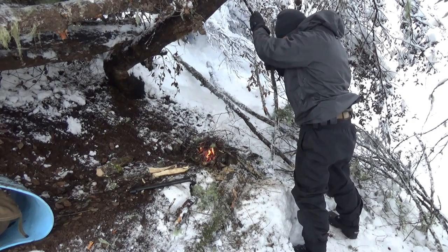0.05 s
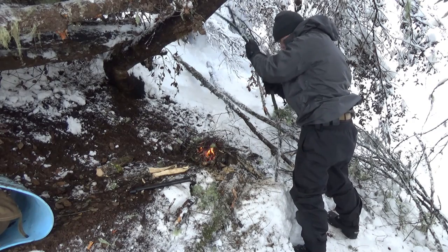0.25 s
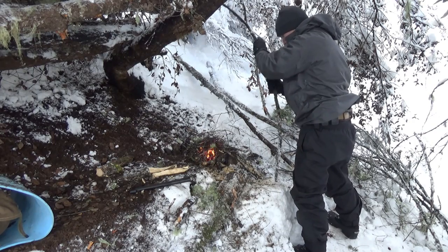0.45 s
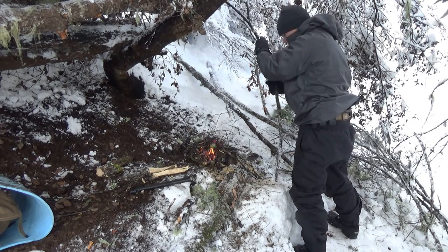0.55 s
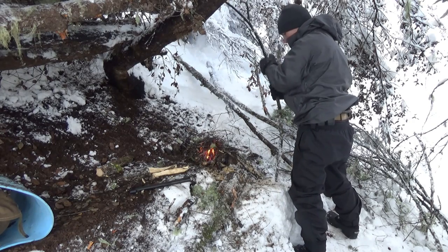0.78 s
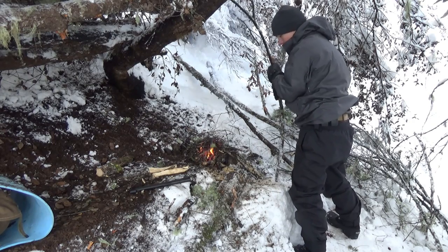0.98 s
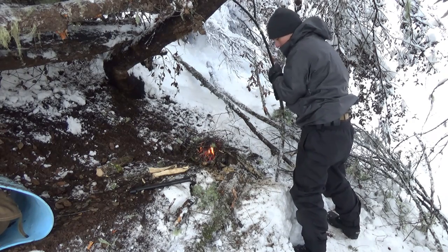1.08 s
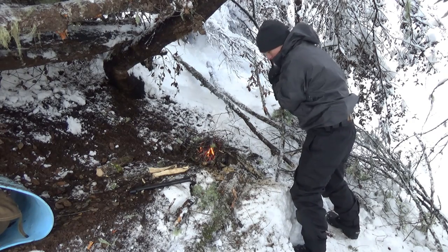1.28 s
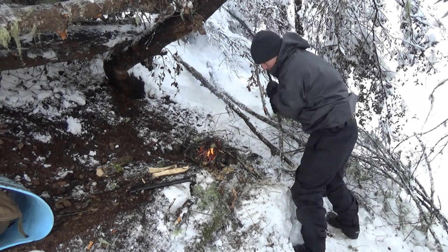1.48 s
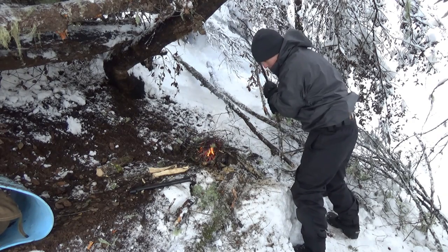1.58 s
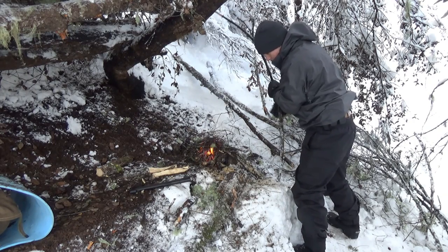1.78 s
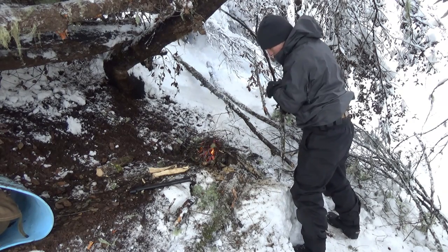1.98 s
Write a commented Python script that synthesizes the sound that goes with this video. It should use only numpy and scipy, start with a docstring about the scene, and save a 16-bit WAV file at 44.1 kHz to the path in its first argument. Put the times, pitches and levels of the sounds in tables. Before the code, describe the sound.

A dry stick breaks into crusted snow at 0.23 s with gritty crunches, a low thud and a sharp, short-ringing wooden knock at 0.27. Nylon sleeves swish around 0.65 and 0.87, then almost continuously from 1.3. A loud fire snap hits at 1.1; smaller pops are scattered throughout. Dull pushes crunch at 1.37-1.44, lighter crackle near 1.86. Tiny high chirps come mostly early, over soft outdoor hiss.

```python
"""A long dry stick is worked into crusted snow beside a small campfire by a man in a nylon jacket.
It crunches in as showers of filtered grains, thuds on damped sines, and knocks on wood as a set of ringing
modes; later it is forced deeper in a few jerks. His sleeves swish as swells of grain hiss and noise,
the burning kindling pops as snaps with tiny rings, and faint gliding sines chirp over
a low outdoor hiss of coloured noise."""
import sys
import numpy as np
from scipy import signal
from scipy.fft import rfft, irfft
from scipy.io import wavfile

SR = 44100
rng = np.random.default_rng(int(sys.argv[2]) if len(sys.argv) > 2 else 0)


def master(y):
    """Save y as 16-bit WAV."""
    cut = np.clip(np.atleast_2d(y).T, -1, 1)
    pcm = np.round(cut * 32767)  # scale
    wavfile.write(sys.argv[1], SR, pcm.astype(np.int16))


N = 90404
T = np.arange(N) / SR  # time axis in s

# Spectrum of the moving air: f/Hz, level/dB
AIR_SPECTRUM = [(24, -50), (40, -4.5), (171, -2.5), (231, -4), (290, -1.5), (402, -2.5), (491, -6.5),
                (1070, -8), (1150, -9.5), (1720, -11), (1950, -13.5), (3060, -14.5), (3930, -10.5),
                (7730, -8), (8990, -6.5), (13100, -10.5), (16000, -15.5)]
AIR_DB, AIR_WAVER_DB = -47.5, -0.8

# Faint high chirps: t/s, length/s, start f/Hz, end f/Hz, level/dB
CHIRPS = [(.015, 0.015, 9800, 8900, -47), (0.042, .02, 10200, 9200, -46.5), (.064, .022, 8520, 9700, -47.5),
          (.088, .014, 9700, 10000, -47), (.198, .024, 8300, 7700, -58), (0.357, 0.018, 8600, 8100, -44.5),
          (0.421, 0.018, 10300, 8500, -43), (0.973, .03, 10600, 10700, -47.5)]
CHIRP_WOBBLE_HZ = 160  # rms

# Swishes of the jacket: peak t/s, rise/s, fall/s, hiss level/dB, body level/dB, hiss tilt/(dB per octave)
SWISHES = [(.215, 0.035, 0.036, -47, -71, -2.5), (.39, 0.046, 0.097, -53.5, -62, -1.5),
           (.65, 0.048, 0.025, -37.5, -44, -2.5), (.72, 0.023, 0.074, -47.5, -51, -3.5),
           (0.869, 0.048, 0.043, -42.5, -49.5, -1), (.99, .025, 0.077, -50, -56, 2),
           (1.305, 0.053, 0.061, -40.5, -50, 4), (1.424, 0.063, 0.016, -37, -41, 0),
           (1.504, 0.03, 0.028, -42, -47, 1), (1.588, .015, 0.013, -47.5, -48.5, 3),
           (1.655, 0.027, 0.043, -44, -51, 2), (1.725, 0.022, 0.0099, -47, -49.5, 1),
           (1.802, 0.037, 0.017, -42, -46.5, 1.5), (1.915, 0.049, 0.065, -43.5, -48.5, 1.5),
           (2.045, 0.031, .04, -41.5, -44, 1.5)]
# Spectrum of the fine rubbing hiss: f/Hz, level/dB
NYLON_HISS_SPECTRUM = [(100, -54), (1000, -15), (3000, -9), (4600, -4), (5800, 1.5), (7000, -1),
                       (9000, -0.5), (10500, -1), (11700, -11.5), (13500, -8.5), (16000, -16.5)]
# Spectrum of the lower cloth body: f/Hz, level/dB
NYLON_BODY_SPECTRUM = [(30, -48), (130, -23), (400, -4.5), (700, 0.5), (1200, -7), (1750, -2), (2600, -7),
                       (4200, -6.5), (8000, -39), (16000, -45)]
NYLON_GRAINS_PER_S, NYLON_SPREAD_DB, NYLON_FLUTTER_DB = 12000, 0, 2

# Pops of the fire, before their shared colour: t/s, level/dB, ring f/Hz, ring t60/s
POPS = [(0.1737, -26, 6400, 0.0028), (.33, -27, 9100, 0.0013), (0.378, -20, 15500, 0.0049),
        (.407, -23.5, 10300, 0.00086), (.5158, -33, 13500, 0.00067), (1.098, -10.5, 7200, 0.0011),
        (1.1065, -22, 4180, 0.0021), (1.5837, -27, 11600, 0.00091), (1.596, -27, 12000, 0.0019),
        (1.6271, -15.5, 5500, 0.0028), (1.796, -18, 11500, .001), (1.8719, -15.5, 8100, 0.0019)]
# Colour of all the pops: f/Hz, gain/dB
POP_COLOUR = [(60, -54), (400, -7.5), (2000, -4), (6000, 0), (12000, 1.5), (16000, -7)]
POP_SNAP_GAIN, POP_SNAP_S = 0.38, 0.00004
POP_SCATTER_DB, POP_SCATTER_T60_S = -13, 0.014

# The stick breaking through crust and twigs: t/s, rise/s, t60/s, level/dB, treble tilt/(dB per octave)
CRUNCHES = [(0.2322, 0.0026, 0.097, -30, 1.5), (.236, 0.0043, 0.11, -24, 0),
            (.254, 0.0068, 0.11, -37.5, -2), (0.2746, 0.0017, 0.049, -22, -1.5),
            (0.288, .003, 0.13, -36.5, -2), (.309, .003, 0.062, -39.5, 3), (1.365, 0.0077, 0.18, -35, 1),
            (1.391, .008, .13, -34.5, -0.5), (1.414, .004, .1, -34, -2), (1.428, 0.009, 0.058, -33.5, -3.5),
            (1.713, 0.0025, 0.08, -43, -2.5), (1.786, 0.0044, 0.085, -43.5, -3.5),
            (1.857, 0.0087, 0.057, -36, 0), (1.869, 0.0049, 0.033, -30.5, 7.5)]
# Spectrum of the breaking grains: f/Hz, level/dB
CRUNCH_SPECTRUM = [(60, -18.5), (250, -10.5), (750, -7), (960, -0.5), (1250, -5), (1750, 0), (2050, -6),
                   (3200, -2.5), (6000, -0.5), (10000, -6), (16000, -14)]
CRUNCH_GRAINS_PER_S, CRUNCH_SPREAD_DB = 14000, 2.5

# Dull pushes into the ground: t/s, level/dB, f/Hz, t60/s
THUDS = [(0.242, -34.5, 134, 0.18), (0.2789, -31.5, 562, .016), (.886, -37.5, 235, 0.079),
         (1.3656, -27.5, 138, 0.07), (1.393, -31, 127, 0.075), (1.417, -29, 173, 0.064),
         (1.44, -33, 120, .1), (1.492, -41, 93, 0.063), (1.53, -48, 242, .05)]
# Spectrum of the loose earth: f/Hz, level/dB
EARTH_SPECTRUM = [(25, -51), (60, 0), (100, -11.5), (210, -3.5), (350, -11.5), (700, -14), (2000, -39)]
THUD_RISE_S, LOOSE_EARTH_GAIN = 0.0029, 0.52

# Ringing modes of the knocked wood: f/Hz, level/dB, t60/s
WOOD_MODES = [(620, -14, .05), (845, -5, .045), (962, 1, .048), (1302, -10, .05), (1453, -6, .035),
              (1508, -3, .042), (1773, -6, .05), (2294, -6, .05), (2610, -11, .055), (3020, -13, .05),
              (3110, -9, .05), (3596, -16, .05), (4724, -14, .06)]
# Spectrum of the crack: f/Hz, level/dB
CRACK_SPECTRUM = [(100, -30), (500, -20), (800, -8), (1050, -16), (1550, 5), (2000, -7), (2400, -6),
                  (3300, -6.5), (4500, -15), (9000, -35), (16000, -45)]
KNOCK_S, KNOCK_DB = 0.2729, -22
JUDDER_HZ, JUDDER_DB, JUDDER_S = 966, -17.5, 0.0052
CRACK_DB, CRACK_S = -21, 0.0046

# Relative colour of the echo from the trees: f/Hz, level/dB
FOREST_COLOUR = [(60, -42), (400, 28.5), (1500, -7), (6000, 16.5), (16000, 9)]
FOREST_DB, FOREST_RISE_S, FOREST_T60_S = -17, 0.0056, 0.13

# Stereo width: f/Hz, side minus middle level/dB
WIDTH = [(30, -51), (70, -24), (180, -14.5), (600, -16), (2000, -31), (5000, -54), (16000, -33)]
LOW_CUT_HZ, EDGE_HZ = 50, 15900


def amp(db):
    """Decibels to gain."""
    return 10 ** (np.asarray(db) / 20)


def unit(x):
    """Scales to rms 1."""
    return x / np.sqrt(np.mean(x ** 2) + 1e-20)


def colour(x, points, tilt_db=0, size=8192):
    """Causal (minimum-phase) filter through f/Hz, gain/dB points, tilted per octave."""
    octave = np.log2(abs(np.fft.fftfreq(size, 1 / SR)) + 1)
    hz, db = np.transpose(points)
    gain_db = np.interp(octave, np.log2(hz), db) + tilt_db * (octave - octave.mean())
    log_gain = np.log(amp(gain_db))
    # The Hilbert transform of the log gain supplies the phase
    response = np.exp(np.conj(signal.hilbert(log_gain)))
    taps = np.fft.ifft(response).real[:size // 2]
    return signal.oaconvolve(x, taps)[:len(x)]


def grains(per_s, spread_db):
    """A dense random train of tiny clicks; a spread above 0 dB makes their sizes uneven."""
    sizes = amp(spread_db * np.minimum(rng.exponential(1, N), 4))
    signs = rng.choice([-1, 1], N)
    return sizes * signs * (rng.random(N) < per_s / SR)


def waver(rate_hz):
    """Slow random drift of rms 1, from noise with a Gaussian low-pass."""
    lowpass = np.exp(-(np.fft.rfftfreq(N, 1 / SR) / rate_hz) ** 2)
    return unit(irfft(rfft(rng.standard_normal(N)) * lowpass, N))


def burst(start, rise, t60):
    """Envelope: a straight rise, then an exponential fall of 60 dB per t60."""
    t = T - start
    attack = np.clip(t / (abs(rise) + 1 / SR), 0, 1)
    return attack * np.exp(-np.log(1000) * np.maximum(t - rise, 0) / t60)


def air():
    """Moving air is a steady outdoor hiss and low murmur, wavering slightly in level."""
    level_db = AIR_DB + AIR_WAVER_DB * waver(rate_hz=22)
    return amp(level_db) * unit(colour(rng.standard_normal(N), AIR_SPECTRUM))


def chirps():
    """Thin, faint whistles: sines that glide in pitch with an unsteady wobble."""
    out = np.zeros(N)
    wobble = CHIRP_WOBBLE_HZ * waver(rate_hz=400)
    for start, length, from_hz, to_hz, db in CHIRPS:
        progress = np.clip((T - start) / length, 0, 1)
        hz = from_hz + (to_hz - from_hz) * progress + wobble
        phase = 2 * np.pi * np.cumsum(hz) / SR
        out += amp(db) * np.sin(np.pi * progress) * np.sin(phase)
    return out


def jacket():
    """Nylon rubs on nylon: a fine-grained hiss and a lower body swell with each move."""
    out = np.zeros(N)
    for peak, rise, fall, hiss_db, body_db, tilt_db in SWISHES:
        width = np.where(T < peak, rise, fall)
        speed = np.exp(-0.5 * (abs(T - peak) / width) ** 1.61)
        rubbing = grains(NYLON_GRAINS_PER_S, NYLON_SPREAD_DB)
        hiss = unit(colour(rubbing, NYLON_HISS_SPECTRUM, tilt_db))
        body = unit(colour(rng.standard_normal(N), NYLON_BODY_SPECTRUM))
        out += speed * (amp(hiss_db) * hiss + amp(body_db) * body)
    return out * amp(NYLON_FLUTTER_DB * waver(rate_hz=110))


def fire():
    """Each pop is one sharp pressure snap and a very short ring, scattered by the sticks around it."""
    out = np.zeros(N)
    for start, db, hz, t60 in POPS:
        t = np.maximum(T - round(start * SR) / SR, 0)  # starts on a whole sample
        u = t / POP_SNAP_S
        snap = POP_SNAP_GAIN * (t > 0) * (2 - u) * u * np.exp(-u)  # push, then pull
        ring = np.sin(2 * np.pi * hz * t) * burst(start, 0, t60)
        scatter = rng.choice([-1, 1], N) * burst(start, 0, POP_SCATTER_T60_S)
        out += amp(db) * (ring + snap + amp(POP_SCATTER_DB) * scatter)
    return colour(out, POP_COLOUR)


def crunches():
    """Every jerk of the stick breaks a shower of icy grains and twig ends."""
    out = np.zeros(N)
    for start, rise, t60, db, tilt_db in CRUNCHES:
        shower = grains(CRUNCH_GRAINS_PER_S, CRUNCH_SPREAD_DB)
        texture = unit(colour(shower, CRUNCH_SPECTRUM, tilt_db))
        out += amp(db) * burst(start, rise, t60) * texture
    return out


def thuds():
    """The ground gives with a low, quickly damped swing and a rumble of loose earth."""
    out = np.zeros(N)
    loose = LOOSE_EARTH_GAIN * unit(colour(rng.standard_normal(N), EARTH_SPECTRUM))
    for start, db, hz, t60 in THUDS:
        swing = np.sin(2 * np.pi * hz * (T - start))
        out += amp(db) * burst(start, THUD_RISE_S, t60) * (swing + loose)
    return out


def knock():
    """The stick judders on the wood for a few milliseconds, cracks, and rings."""
    t = T - KNOCK_S
    ring = np.zeros(N)
    for k, (hz, db, t60) in enumerate(WOOD_MODES):
        sign = (-1) ** k  # neighbouring modes start in opposite directions
        ring += sign * amp(db) * burst(KNOCK_S, 0, t60) * np.sin(2 * np.pi * hz * t)
    judder_shape = np.sqrt(abs(np.sin(np.pi * np.clip(t / JUDDER_S, 0, 1))))
    judder = judder_shape * np.sin(2 * np.pi * JUDDER_HZ * t)
    contact = (t > 0) & (t < CRACK_S)
    crack = unit(colour(rng.choice([-1, 1], N) * contact, CRACK_SPECTRUM))
    crack *= np.sqrt(contact.mean())  # gives it the energy of rms 1 over the contact alone
    return amp(KNOCK_DB) * ring + amp(JUDDER_DB) * judder + amp(CRACK_DB) * crack


def forest(x):
    """A weak, short echo from trunks and the bank: a decaying noise tail of unit energy."""
    tail = colour(rng.standard_normal(N), FOREST_COLOUR) * burst(0, FOREST_RISE_S, FOREST_T60_S)
    tail = unit(tail) / np.sqrt(N)
    return amp(FOREST_DB) * signal.fftconvolve(x, tail)[:N]


def scene():
    """All sources lie ahead, with a little width from a diffused copy of the middle."""
    hits = fire() + crunches() + thuds() + knock()
    mid = hits + forest(hits) + jacket() + chirps() + air()
    spread = unit(rng.standard_normal(N) * burst(0, 0, 0.03)) / np.sqrt(N)
    side = colour(signal.fftconvolve(mid, spread)[:N], WIDTH)
    return np.array([mid + side, mid - side])


def record(dry):
    """The microphone's low cut and the recorder's band limit."""
    low_cut = signal.butter(4, LOW_CUT_HZ, "high", fs=SR, output="sos")
    thin = signal.sosfilt(low_cut, dry)
    band_limit = signal.firwin(511, EDGE_HZ, window=("kaiser", 8), fs=SR)
    return signal.oaconvolve(thin, band_limit[None], "same")


dry = scene()
out = record(dry)
master(out)
```